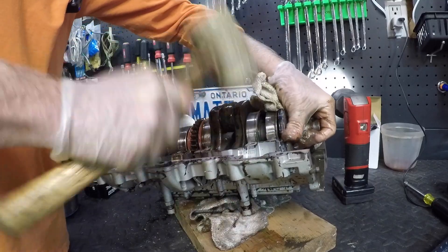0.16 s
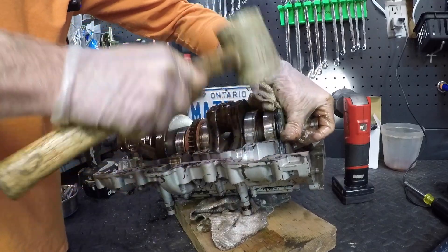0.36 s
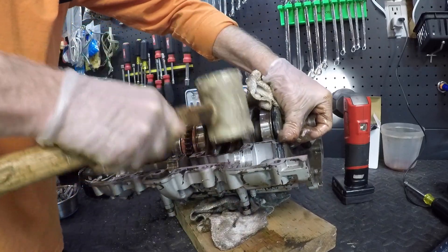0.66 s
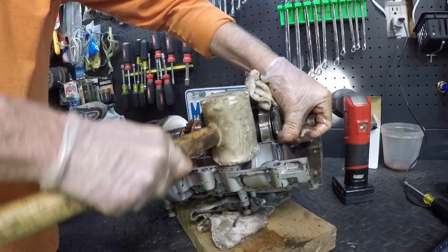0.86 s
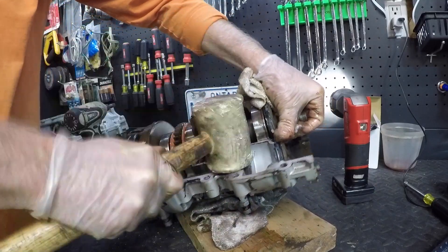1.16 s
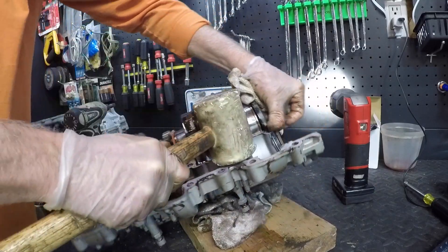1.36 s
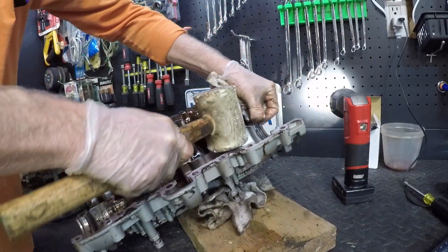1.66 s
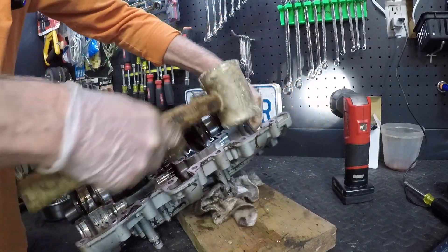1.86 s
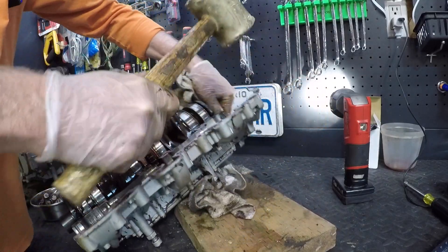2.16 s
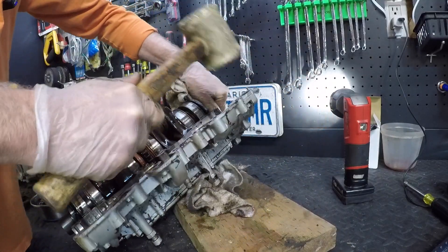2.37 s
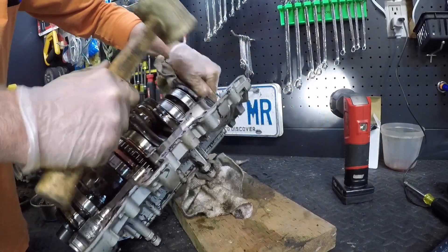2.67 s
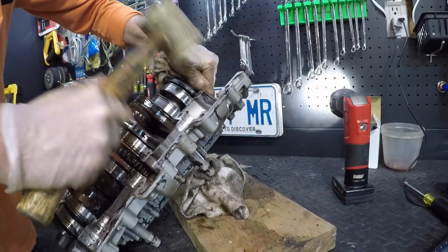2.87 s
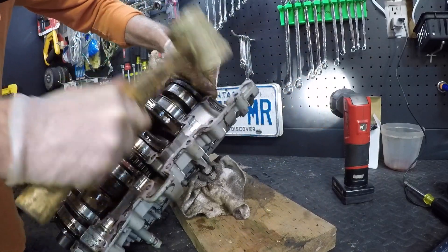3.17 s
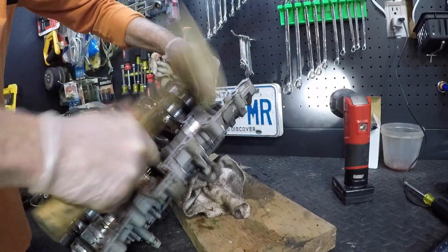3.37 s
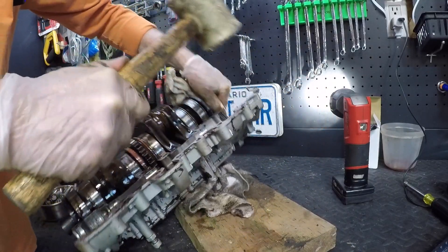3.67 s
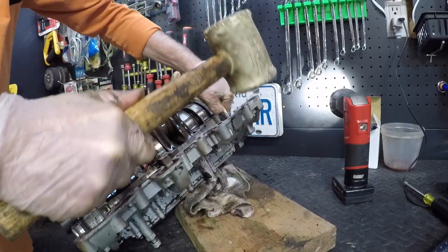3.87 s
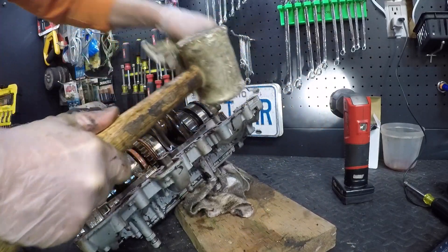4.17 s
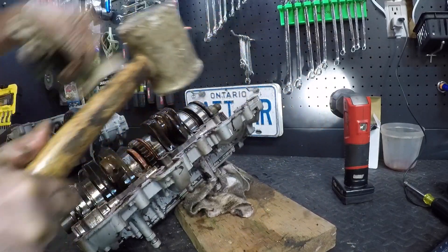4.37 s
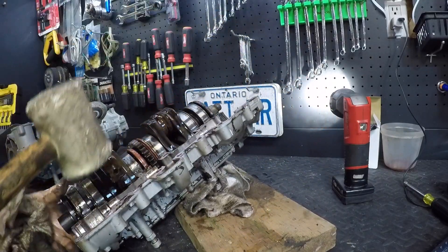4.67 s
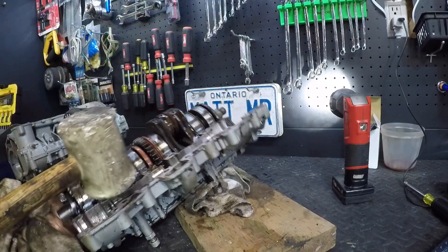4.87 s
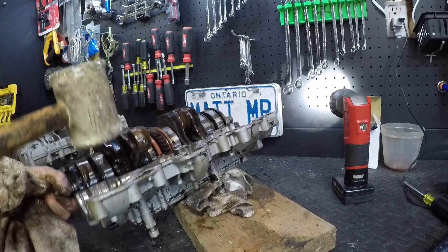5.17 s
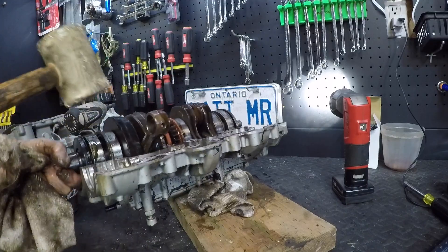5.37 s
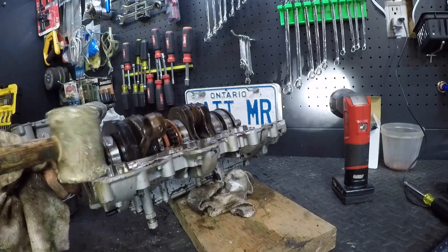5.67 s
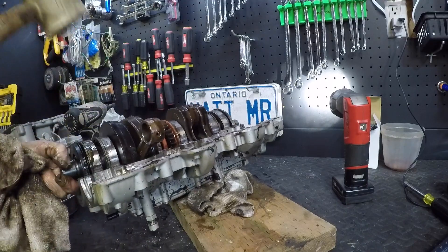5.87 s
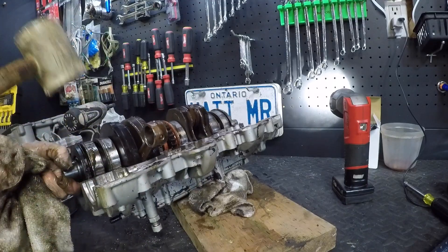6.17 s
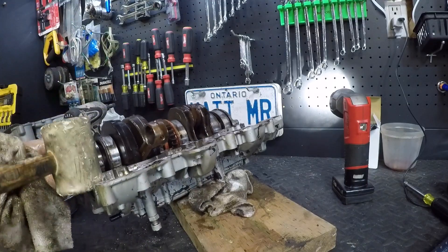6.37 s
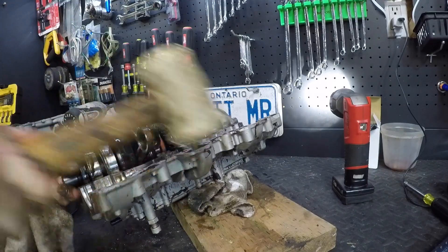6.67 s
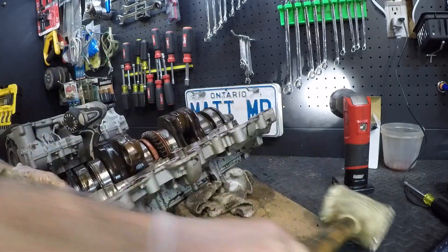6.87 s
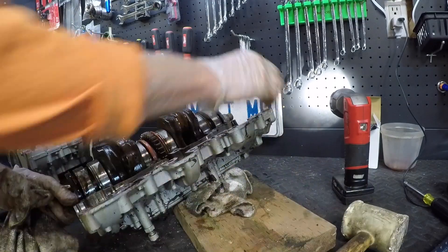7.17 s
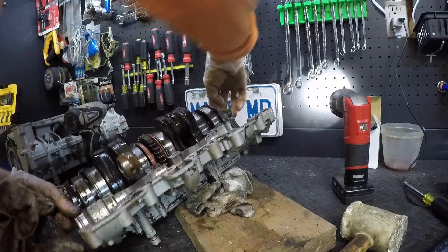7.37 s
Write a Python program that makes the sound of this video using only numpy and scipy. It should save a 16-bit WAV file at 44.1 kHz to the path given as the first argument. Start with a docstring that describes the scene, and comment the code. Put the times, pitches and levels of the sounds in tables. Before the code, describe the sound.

A small workshop with low, broad room noise, fan hum and a thin whine near 900 Hz that swells and fades. A mallet hits an aluminium case hard at about 0.14, 0.48, 0.78 and 1.09 seconds: sharp crack, short dry metallic ring, bench thud dropping in pitch, loose parts clattering just after. Cloth and gloves rustle around 1.6-2.2 as the case shifts with dull bumps near 1.9. Two brighter blows fall at 2.98 and 3.31 with less bench weight and more rattling, then a lighter clink at 3.6. A rag drags over gears at 4.5, followed by soft bumps near 4.9. Three more blows land at 5.6, 5.9 and 6.2. From 6.74 to 7.0 the mallet is laid down in woody knocks, then small settling taps and rustle to 7.5. Close camera microphone; its gain dips at blows and the background creeps back, with short room echo.

```python
"""Hard mallet blows, each with a crack, a ringing case and a thud falling in pitch; parts rattle after them and
as the case rocks. A rawhide mallet knocks a shaft loose in an aluminium engine case that rocks on a wooden
bench; then it is laid down. Ringing modes and noise make the contacts, patchy noise the rag, gloves and room,
narrow noise and a tone the fan. A small camera turns its gain down around loud sound, lets it creep back, and
rounds off the peaks."""
import sys
import numpy as np
from scipy import signal
from scipy.fft import rfft, irfft, next_fast_len
from scipy.io import wavfile
from scipy.ndimage import uniform_filter1d, minimum_filter1d

SR = 44100
rng = np.random.default_rng(int(sys.argv[2]) if len(sys.argv) > 2 else 0)


def store_pcm(level_fs):
    """Save levels as 16-bit WAV."""
    pcm = np.round(np.clip(level_fs, -1, 1) * 32767).astype(np.int16)
    wavfile.write(sys.argv[1], SR, np.atleast_2d(pcm).T)


N = 331632  # length in samples

# Workshop noise. Each row: pitch in Hz, relative level in dB.
AIR_SPECTRUM = [(20, -22), (53, -16), (72, -12), (150, -6), (228, -11.5), (472, -6.5), (850, -11.5),
                (1440, -13.5), (1860, -19.5), (3530, -24.5), (7000, -35.5), (15200, -53), (15500, -102)]
# The fan's fuzzy tones. Each row: pitch in Hz, level in dB, half-width in Hz.
FAN_TONES = [(118.2, -43, 1.6), (152.2, -37.5, 3.3), (918, -43, 6.9)]
# The fan motor's tone swells and fades. Each row: time in seconds, level in dB.
WHINE_LEVEL = [(0, -44.5), (1.2, -38), (2.2, -32.5), (3.0, -40.5), (4.6, -36.5), (5.4, -40), (6.6, -39),
               (7.1, -31), (7.52, -39.5)]
# Swishes of rag and gloves. Each row: peak in seconds, level in dB, seconds to swell by 20 dB.
# Rows with a swell time of zero or less stay silent.
SWISHES = [(1.63, -41, 0.44), (1.736, -34, 0.03), (1.828, -34.5, .1), (1.984, -39.5, -0.1),
           (2.052, -34, .07), (2.1, -36, 0.16), (2.214, -39, -0.1), (2.732, -45, 0.2), (2.856, -46.5, -0.1),
           (3.96, -38.5, -0.28), (4.46, -44, 0.06), (4.66, -30, -0.08), (4.702, -33, 0),
           (4.835, -38.5, 0.1), (5.118, -43.5, 0.67), (5.228, -46, 0.4), (5.49, -53.5, 0.5),
           (6.79, -34.5, -0.03), (6.92, -29, -0.02), (6.97, -45, 0.4), (7.196, -33, -0.07),
           (7.27, -53.5, 0.4), (7.386, -35, 0.47)]
# Colour of the swishes. Each row: pitch in Hz, relative level in dB.
CLOTH_SPECTRUM = [(1200, -52.5), (2500, 8.5), (4000, 8.5), (8000, 2), (12000, -4.5), (15200, -11),
                  (15500, -64)]
# Colour of the rag dragged over the gears. Each row: pitch in Hz, relative level in dB.
GEAR_SPECTRUM = [(400, -13), (900, -2.5), (1300, -4.5), (1800, 4.5), (2200, -6.5), (3700, -7),
                 (5000, -10.5), (15200, -29.5), (15500, -80)]
# How echoes die in the workshop. Each row: pitch in Hz, seconds to fall by 60 dB.
SHOP_DECAY = [(100, 0.79), (500, 0.47), (2000, 0.49), (6000, 0.3), (14000, 0.23)]
# Ringing modes of the metal case. Each row: pitch in Hz, relative level in dB, seconds to fall by 60 dB.
CASE_MODES = [(554, -9.5, 0.069), (673, -10, 0.072), (730.3, -8, 0.095), (879, -4, 0.1), (1008, -8.5, 0.13),
              (1127, -9, 0.072), (1370, -9.5, 0.11), (1445, -19.5, 0.28), (1564, -13, 0.11),
              (1818, -18, 0.057), (1986, -12, 0.14), (2426, -7.5, 0.069), (2596, -10, 0.03),
              (2927, -11.5, 0.1), (3194, -4, 0.092), (3735, -2.5, 0.077), (4525, -7, 0.078),
              (5655, -8.5, 0.071), (6500, -35, 0.069), (7170, -11, 0.041), (7340, -7, 0.065),
              (7550, -14.5, 0.084), (8300, -18.5, 0.042), (11500, -19, 0.04), (13330, -20, 0.026),
              (13800, -19, 0.052), (14150, -29, 0.034)]
# Ringing modes of the wooden bench. Each row: pitch in Hz, relative level in dB, seconds to fall by 60 dB.
BENCH_MODES = [(68.7, 11, 0.1), (79.7, -5.5, 0.36), (106.6, 1.5, 0.14), (126.2, 3, 0.16), (178, 4.5, 0.077),
               (203.4, -2, 0.26), (256.7, 9.5, 0.1), (303.4, -4, 0.29), (359, -7, .15), (437.8, -4, 0.21)]
# Colour of the crack of a contact. Each row: pitch in Hz, relative level in dB.
CRACK_SPECTRUM = [(200, -23.5), (600, 7), (1500, -7), (3000, -3), (6000, -5.5), (9000, -13), (15000, -26),
                  (16000, -55.5)]
# The mallet is laid down, head then handle, and wobbles. Each row: start in seconds, force in dB,
# treble change in dB, favoured bench pitch in Hz, pitch in Hz that sets where the thud starts.
MALLET_DOWN = [(6.744, -26.5, -5, 136, 297), (6.818, -5, -8, 125, 453), (6.86, -19, -30, 196, 248),
               (6.929, -3.5, -6.5, 410, 463), (6.949, -19.5, -16, 80, 302), (7.009, -25, -23, 277, 310)]
# The case rocks and is set down on the bench. Each row: start in seconds, force in dB, bench change in dB,
# treble change in dB, favoured bench pitch in Hz, favoured case pitch in Hz, how clearly it pings in dB.
SETTLING = [(0.158, -10, 2, -25, 207, 885, 8), (0.177, -2.5, 4.2, -21, 254, 780, 8.5),
            (1.85, 1, -9.5, -19.5, 288, 602, 11), (1.871, -4, -37, -20.5, 328, 1054, 16),
            (1.884, -14, -31, -24, 300, 1110, 19), (2.103, -21, -27, -4.5, 140, 2550, 15.5),
            (2.112, -28.5, -18, -4.5, 118.7, 2920, 17), (3.618, -16, 7.5, -5.5, 130, 667, 3),
            (4.51, -19, -17, -19, 135, 1890, 22), (4.69, -32, 6, -12, 70, 150, 2),
            (4.828, -20.5, 10, -27, 110, 198, 6.5), (4.851, -23.5, 13.5, -24, 74.5, 148, 6),
            (4.87, -15.5, -10, -37, 190, 780, 22), (4.896, -22.5, 23, -1, 106, 152, 6),
            (4.921, -8, -0.5, -21, 251, 870, 13), (4.939, -18, 3, -32, 151, 251, 6),
            (5.174, -9, 8, -17, 150, 616, 5), (5.644, 5, 2.5, -20, 175, 423, 4),
            (5.983, 4.5, 2, -28, 200, 325, 8), (7.079, -8, 10, -2, 304, 295, 4),
            (7.094, -23, 19.5, -18, 179, 220, 4), (7.134, -21, 8, -23, 270, 262, 1),
            (7.2, -17, 5, -1, 250, 291, 5), (7.214, -20.5, 15.5, -7, 132, 225, 10),
            (7.269, -27, 11, -1, 204, 230, 4), (7.295, -26.5, 10, -20, 111, 198, 7)]
# Loose parts knock inside the case, after blows and as the case rocks. Each row: start in seconds, force in dB,
# treble change in dB, # favoured low and high case pitch in Hz, how clearly they ping in dB.
RATTLES = [(0.142, 9.5, -27.5, 527, 7300, 20.5), (0.485, 7, -21, 510, 4060, 16),
           (0.491, 2, -16, 764, 4600, 24), (0.519, -8.5, -17, 880, 4400, 15.5),
           (0.787, 11, -11, 720, 7600, 14), (0.818, -6, -36, 993, 4330, 11),
           (1.098, 10, -13, 920, 7660, 9), (1.144, 1, -17.5, 815, 4600, 10),
           (1.165, -6.5, -12, 790, 4600, 12), (2.986, 4.5, 2, 520, 7300, 20.5),
           (3.015, -5, -31, 1103, 4850, 24.5), (3.041, 6, -14, 849, 5630, 17.5),
           (3.069, -3.5, -30, 1120, 4820, 17), (3.317, 8, -5.5, 1010, 7400, 19),
           (3.348, -6, -34, 1040, 4800, 12), (3.365, -2, -8.5, 2640, 5630, 15),
           (3.409, -2, -17, 2000, 4450, 15.5), (3.433, -6.5, -33, 943, 4450, 17),
           (3.633, -0.5, -16, 800, 4600, 10), (3.656, -5, -7, 880, 3600, 11),
           (3.676, -1.5, -23, 868, 4800, 14.5), (5.607, 8.5, -11, 900, 7720, 7),
           (5.625, 1, -6, 886, 5640, 9), (5.654, 9.5, -18, 684, 4250, 1),
           (5.686, 0, -22.5, 1450, 4680, 15), (5.957, 7, -13, 1020, 4200, 9.5),
           (5.999, 6.5, -16, 1420, 4500, 12), (6.039, 2.5, -21, 950, 4200, -3),
           (6.235, 8.5, -11, 980, 2950, 11), (6.269, 8.5, -16, 750, 2400, 8.5),
           (6.309, 0.8, -21.5, 640, 5600, 9), (6.364, -22, -4, 638, 11400, 27)]
# How firmly the case rests on the bench: flat, tipped up on an edge, flat again.
# Each row: time in seconds, bench change in dB, favoured bench pitch in Hz.
FOOTING = [(1.1, -5.5, 135), (3.0, -28, 340), (3.04, -36.5, 300), (3.45, -32.5, 231), (3.63, -17, 207),
           (5.6, -10.5, 80), (6.3, -8, 110)]
# Mallet blows. Each row: start in seconds, force in dB, bench change in dB, treble change in dB,
# favoured bench, low case and high case pitch in Hz.
BLOWS = [(0.137, 8.5, 0, -10.5, 103, 567, 6500), (0.475, 16, -1, -15.5, 127, 628, 6550),
         (0.78, 17.5, -4.5, -14, 100, 730, 6750), (1.091, 13, -5, -12.5, 95, 890, 7500),
         (2.979, 16, -4.5, -16, 270, 508, 7260), (3.312, 13, -3.5, -16, 182, 1014, 7350),
         (5.598, 9, -4, -7, 203, 574, 3600), (5.915, 13.5, -6.5, -17.5, 96, 544, 4700),
         (6.201, 5.5, -0.5, -11, 157, 556, 4400)]

WHINE_HZ = 908
FADE_SHARE = 0.62  # a swish fades in this share of its swell time
DRAG_S, DRAG_ATTACK_S, DRAG_HOLD_S, DRAG_RELEASE_S = 4.51, 0.032, 0.1, 0.3
DRAG_DB, DRAG_SAG_DB = -22, 2.5  # the drag weakens while it holds
GEAR_HZ = 4310  # the high pitch that soft contacts favour
MALLET_BENCH_DB, MALLET_PING_DB, BLOW_PING_DB = 9.5, 3, 12.5
TOP_HZ = 16300  # the camera passes nothing above this


def amp(db):
    """Turn dB into a plain multiplier."""
    return 10 ** (np.asarray(db) / 20)


def unit(x):
    """Scale x to an rms of 1."""
    return x / np.sqrt(np.mean(x ** 2) + 1e-20)


def along(points, hz):
    """Read a table of (Hz, value) points on a log pitch axis."""
    f, v = np.transpose(points)
    return np.interp(np.log(hz + 1), np.log(f + 1), v)


def level(rows):
    """Gain per sample from (seconds, dB) rows, inaudible outside them."""
    s, db = np.transpose(rows)
    return amp(np.interp(np.arange(N) / SR, s, db, left=-120, right=-120))


def filtered(x, response):
    """Multiply each frequency of x by response(Hz)."""
    m = next_fast_len(len(x) + 8192)
    return irfft(rfft(x, m) * response(np.fft.rfftfreq(m, 1 / SR)), m)[:len(x)]


def rush(spectrum, patchy_db):
    """Coloured noise of rms 1, with patches of random gain over time and pitch."""
    z = signal.stft(rng.standard_normal(N), nperseg=512)[2]
    patches = uniform_filter1d(uniform_filter1d(rng.standard_normal(z.shape), 12, 0), 6, 1)
    x = signal.istft(z * amp(patchy_db * unit(patches)), nperseg=512)[1][:N]
    return unit(filtered(x, lambda hz: amp(along(spectrum, hz))))


def fan():
    """Narrow bands of noise hum; a motor whine swells and fades as its phase wanders a little."""
    hum = np.zeros(N)
    for centre, db, width in FAN_TONES:
        band = filtered(rng.standard_normal(N), lambda f: 1 / (1 + ((f - centre) / width) ** 2))
        hum += amp(db) * unit(band)
    wander = 0.014 * np.cumsum(rng.standard_normal(N))
    tone = np.sqrt(2) * np.sin(2 * np.pi * WHINE_HZ * np.arange(N) / SR + wander)
    return hum + level(WHINE_LEVEL) * tone


def workshop():
    """Broad, slightly patchy room noise with the fan in it."""
    return amp(-30.5) * rush(AIR_SPECTRUM, 0.86) + fan()


def cloth():
    """Rag and gloves swish as swelling noise; one drag is louder and takes the colour of the gears."""
    swishes = np.zeros(N)
    for s, db, swell in SWISHES:
        swishes += level([(s - 3 * swell, db - 60), (s, db), (s + 3 * FADE_SHARE * swell, db - 60)])
    lift = DRAG_S + DRAG_HOLD_S
    sagged_db = DRAG_DB - DRAG_SAG_DB
    drag = level([(DRAG_S - DRAG_ATTACK_S, DRAG_DB - 21.5), (DRAG_S, DRAG_DB),
                  (lift, sagged_db), (lift + DRAG_RELEASE_S, sagged_db - 39)])
    return swishes * rush(CLOTH_SPECTRUM, 1.0) + drag * rush(GEAR_SPECTRUM, 0.92)


def dying(t60, seconds):
    """Echo noise of energy 1 in which each frequency dies at its own speed."""
    hz, t, z = signal.stft(rng.standard_normal(int(seconds * SR)), SR, nperseg=128)
    tail = signal.istft(z * amp(-60 * t / along(t60, hz)[:, None]), SR, nperseg=128)[1]
    return tail / np.linalg.norm(tail)


def ringing(modes, db, t, waver, jolt_db):
    """Fading sine modes; loose joints make the phase wander and damp a first, louder jolt quickly."""
    hz, _, t60 = np.transpose(modes)[:, :, None]
    drift = waver * np.sqrt(hz / 1000) * np.cumsum(rng.standard_normal((len(modes), len(t))), axis=1)
    drift = uniform_filter1d(drift, size=32, axis=1)
    start = rng.uniform(0, 2 * np.pi, hz.shape)
    fade = amp(-60 * t / t60) + amp(jolt_db - 60 * t / (0.4 * t60))
    return np.sum(amp(db[:, None]) * fade * np.sin(2 * np.pi * hz * t + start + drift), axis=0)


def near(hz, centre, width):
    """1 at the centre pitch, falling smoothly to 0 away from it."""
    return np.exp(-(np.log(hz / centre) / width) ** 2)


def tilt(hz, treble_db):
    """Treble change in dB, growing from none at 1800 Hz to all of it an octave higher."""
    return treble_db * np.clip(np.log2(hz / 1800 + 1e-9), 0, 1)


def case_ring(t, treble_db, low_hz, high_hz, ping_db):
    """The metal case rings; where the contact lands decides which modes it favours."""
    hz, db, _ = np.transpose(CASE_MODES)
    overtone = 1.1 * near(hz, 1.87 * high_hz, 0.06)  # the struck part also sounds its next mode
    favour = near(hz, low_hz, 0.08) + 0.85 * near(hz, high_hz, 0.09) + overtone
    db = db + tilt(hz, treble_db) + ping_db * favour + rng.normal(0, 3, len(hz))
    return ringing(CASE_MODES, db, t, waver=0.048, jolt_db=5.5)


def contact_crack(t, treble_db, crack_t60):
    """A fading burst of noise cracks, with a duller after-rattle."""
    shiver = filtered(rng.standard_normal(len(t)), lambda f: 1 / (1 + (f / 7000) ** 2))
    burst = rng.standard_normal(len(t)) * amp(-60 * t / crack_t60)
    burst += shiver * amp(-6 - 60 * t / 0.081)
    return amp(7.0) * filtered(burst, lambda f: amp(along(CRACK_SPECTRUM, f) + 0.85 * tilt(f, treble_db)))


def bench_thud(t, path, boom_hz, low_hz):
    """Bending waves travel as the root of pitch: the high part arrives first, so the thud falls."""
    first = path / np.sqrt(min(1.484 * low_hz, 950))  # arrival in s; a softer contact starts lower
    last = path / np.sqrt(min(0.58 * boom_hz, low_hz))
    wave = np.sin(2 * np.pi * path ** 2 / (t + first)) * np.exp(-(t / (last - first)) ** 3)
    return wave * ((t + first) / first) ** 0.22  # the slow, low part carries more of the push


def bench_boom(t, boom_hz):
    """The bench's own modes ring, building up over some hundredths of a second."""
    hz, db, _ = np.transpose(BENCH_MODES)
    db = db + 9 * near(hz, boom_hz, 0.29) + rng.normal(0, 3.2, len(hz))
    boom = ringing(BENCH_MODES, db, t, waver=0.083, jolt_db=7.0)
    return amp(-17.5) * boom * (1 - np.exp(-(t / 0.013) ** 2))


def contacts(rows, path, case_db, crack_t60, thud_db, wet_db):
    """Each contact rings the case, cracks, shakes the bench and echoes; path is in s*sqrt(Hz)."""
    out, t = np.zeros(N + 2 * SR), np.arange(int(0.35 * SR)) / SR
    for s, db, bench_db, treble_db, boom_hz, low_hz, high_hz, ping_db in rows:
        case = amp(case_db) * case_ring(t, treble_db, low_hz, high_hz, ping_db)
        crack = contact_crack(t, treble_db, crack_t60)
        bench = amp(thud_db) * bench_thud(t, path, boom_hz, low_hz) + bench_boom(t, boom_hz)
        hit = amp(db) * (case + crack + amp(bench_db) * bench)
        hit = hit * (1 - np.exp(-t / 0.00046))  # soften the very start
        echo = np.pad(signal.fftconvolve(hit, dying(SHOP_DECAY, 0.47)), (300, 0))  # 300 samples late
        start = round(s * SR)
        out[start:][:len(hit)] += hit
        out[start:][:len(echo)] += amp(wet_db) * echo
    return out[:N]


def mallet_laid_down():
    """The mallet's head and handle meet the bench in light contacts, strong in the wood."""
    rows = [(s, db, MALLET_BENCH_DB, treble_db, boom_hz, low_hz, GEAR_HZ, MALLET_PING_DB)
            for s, db, treble_db, boom_hz, low_hz in MALLET_DOWN]
    return contacts(rows, path=0.2103, case_db=-17, crack_t60=0.047, thud_db=-1.5, wet_db=-10.0)


def case_settling():
    """The rocking case meets the bench in softer contacts."""
    rows = [(*row, GEAR_HZ, ping_db) for *row, ping_db in SETTLING]
    return contacts(rows, path=0.23, case_db=-14.0, crack_t60=0.04, thud_db=-3.5, wet_db=-11.5)


def loose_parts():
    """Parts knock inside the case; its footing decides how much reaches the bench."""
    foot_s, foot_db, foot_hz = np.transpose(FOOTING)
    rows = [(s, db, np.interp(s, foot_s, foot_db), treble_db, np.interp(s, foot_s, foot_hz), *modes)
            for s, db, treble_db, *modes in RATTLES]
    return contacts(rows, path=0.151, case_db=-15.5, crack_t60=0.013, thud_db=0.0, wet_db=-15.0)


def mallet_blows():
    """The mallet strikes the case, which passes the push on to the bench."""
    rows = [(*row, BLOW_PING_DB) for row in BLOWS]
    return contacts(rows, path=0.25, case_db=-12.5, crack_t60=0.059, thud_db=3.0, wet_db=-19.5)


def scene():
    """The room, the cloth and four kinds of contact."""
    background = workshop() + cloth()
    soft = mallet_laid_down() + case_settling()
    return (background + soft + loose_parts() + mallet_blows())[None]


def record(dry):
    """The camera's gain drops with loud sound, holds and creeps back; peaks are rounded, pitch range limited."""
    x, t = dry[0], np.arange(N) / SR
    loud_db = 10 * np.log10(np.abs(uniform_filter1d(x ** 2, 441)) + 1e-12)
    cut_db = np.clip(0.62 * (loud_db + 10), 0, 16)
    hold = int(0.3 * SR)  # keep the deepest cut of the last 0.3 s
    cut_db = -minimum_filter1d(-cut_db, hold, origin=(hold - 1) // 2, mode="constant")
    release = 19 * t  # dB regained since the start
    cut_db = np.maximum.accumulate(cut_db + release) - release
    ahead = int(0.014 * SR)  # the gain moves a little before the sound it answers
    cut_db = np.pad(cut_db[ahead:], (0, ahead), "edge")
    x = x * amp(-uniform_filter1d(cut_db, 441))
    x = x / (1 + np.abs(x / 0.92) ** 5) ** (1 / 5)  # soft clipping
    return filtered(x, lambda hz: (hz < TOP_HZ) * hz ** 2 / (hz ** 2 + 45 ** 2))[None]


dry = scene()
out = record(dry)
store_pcm(out)
```